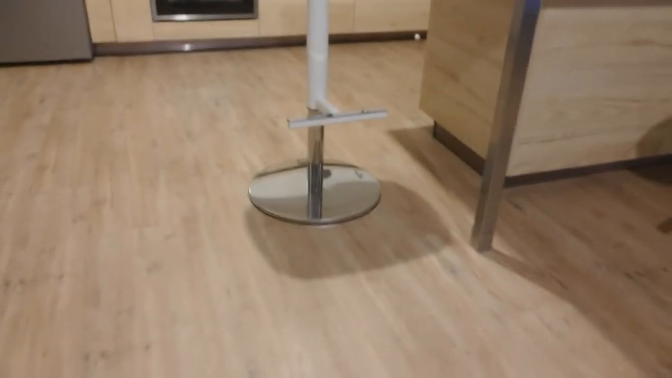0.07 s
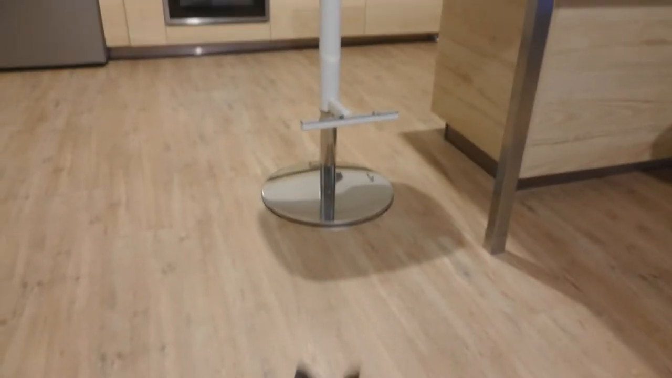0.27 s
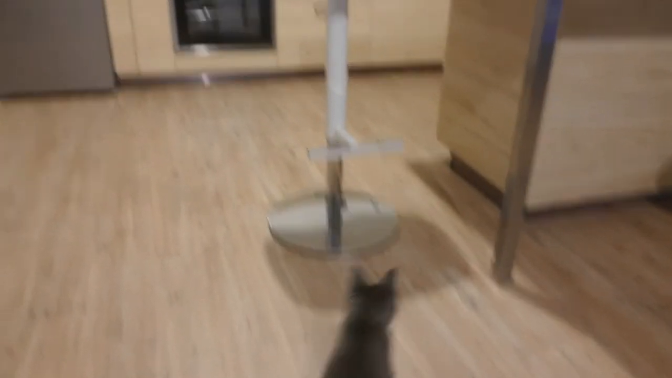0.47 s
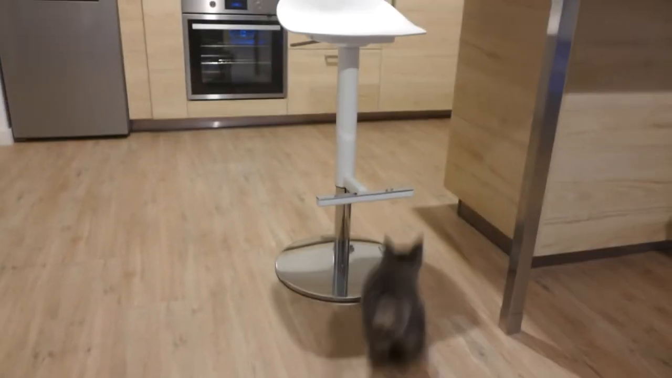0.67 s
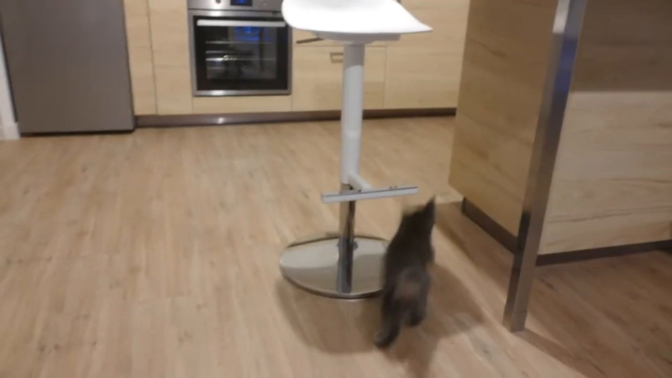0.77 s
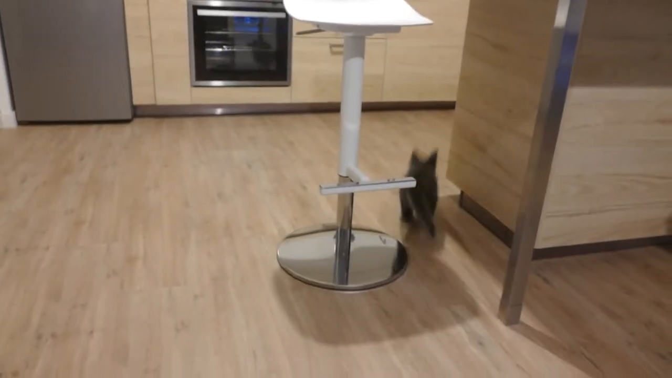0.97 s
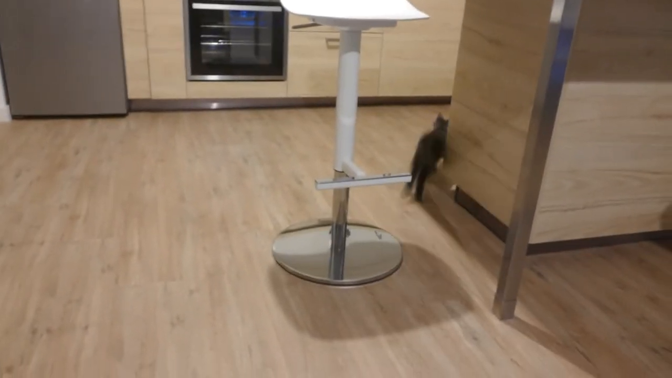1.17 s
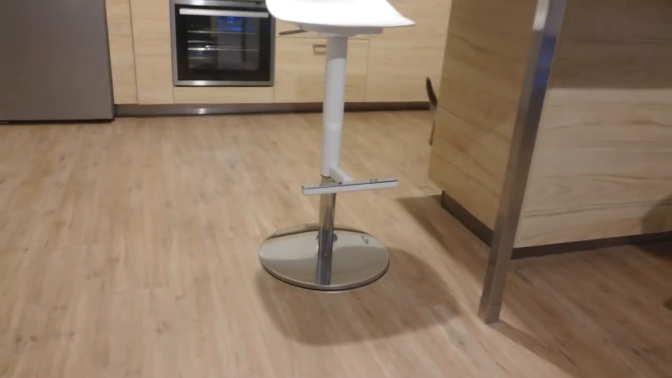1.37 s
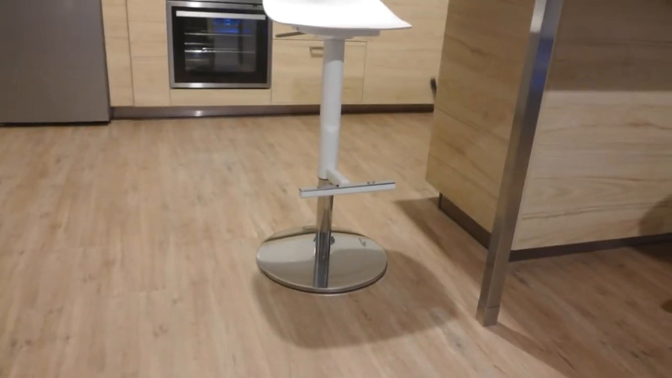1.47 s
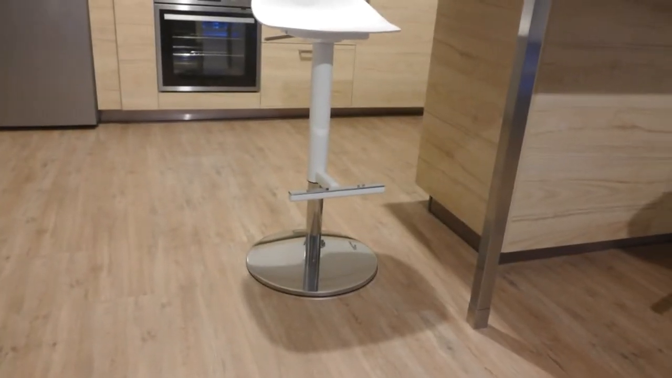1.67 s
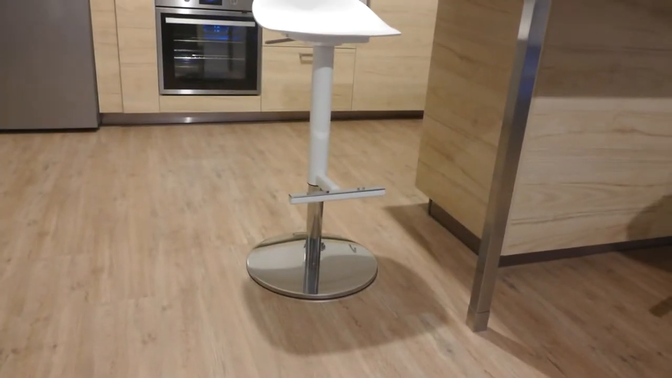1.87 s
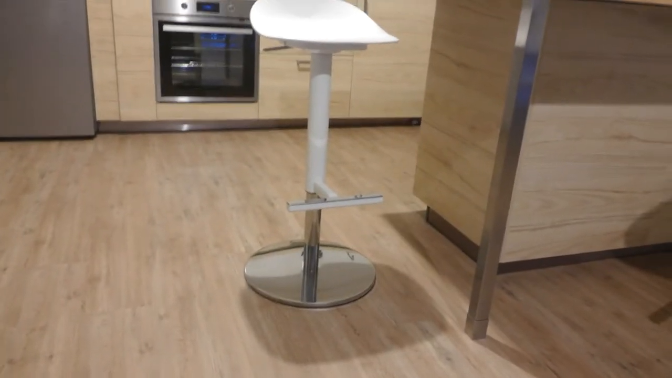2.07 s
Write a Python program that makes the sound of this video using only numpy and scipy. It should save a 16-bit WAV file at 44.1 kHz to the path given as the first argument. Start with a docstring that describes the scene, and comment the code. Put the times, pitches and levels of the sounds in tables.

```python
"""A crumpled foil ball knocks on a kitchen's laminate floor as a kitten chases it, the first hit already sounding.
Squeaks of a scuff and one heavy two-contact thump set the boards and the room ringing.
The ball rolls, knocks on behind the counter and skids: clusters and grains of foil clicks, coloured and reverberated.
Paws flex the boards softly. Close by and fairly dry, fingers (most likely) click and creak a small case:
noise ticks, short decaying modes and stick-slip grains. A steady noise room tone lies underneath."""
import sys
import numpy as np
from scipy import signal
from scipy.fft import rfft, irfft
from scipy.io import wavfile
from scipy.ndimage import uniform_filter1d

SR = 44100
rng = np.random.default_rng(int(sys.argv[2]) if len(sys.argv) > 2 else 0)


def persist_wave(psi):
    """Save psi, clipped to +-1, as 16-bit WAV."""
    counts = np.round(np.clip(psi, -1, 1) * 32767).astype(np.int16)
    wavfile.write(sys.argv[1], SR, np.atleast_2d(counts).T)


N = 92610
T = np.arange(N) / SR
BASS_HZ, TREBLE_HZ = 450, 2780  # corners of the two tone shelves
FACETS_PER_S = 2500  # average rate of foil facet clicks


def amp(db):
    """Decibels to gain."""
    return 10 ** (np.asarray(db) / 20)


def decay(t, t60):
    """Exponential fall of 60 dB in t60 seconds."""
    return np.exp(-np.log(1000) * t / t60)


def read(points, hz):
    """Interpolates a table on a log-frequency axis, holding its end values."""
    f, value = np.transpose(points)
    return np.interp(np.log(hz + 1), np.log(f + 1), value)


def add(mix, s, sound):
    """Lays a sound into the mix at time s; it may have begun before zero."""
    at = round(s * SR)
    sound = sound[..., max(-at, 0):]
    part = mix[:, max(at, 0):][:, :sound.shape[-1]]
    part += sound[..., :part.shape[1]]


def through(x, response):
    """Convolution, channel by channel."""
    return signal.fftconvolve(np.atleast_2d(x), np.atleast_2d(response), axes=1)[:, :N]


def filtered(x, order, hz, kind):
    """Butterworth filter."""
    return signal.sosfilt(signal.butter(order, hz, kind, fs=SR, output="sos"), x)


def colour(x, points, bass_db=0, treble_db=0, size=4096):
    """Minimum-phase filter with the given spectrum plus a bass and a treble shelf."""
    hz = abs(np.fft.fftfreq(size, 1 / SR))
    db = read(points, hz)
    db += bass_db / (1 + (hz / BASS_HZ) ** 2)
    db += treble_db * hz ** 2 / (hz ** 2 + TREBLE_HZ ** 2)
    # The Hilbert transform of the log gain gives the phase of a causal response.
    spectrum = np.exp(np.conj(signal.hilbert(np.log(amp(db)))))
    return through(x, np.fft.ifft(spectrum).real[:size // 2])


# Likeness of the two ports in diffuse sound. Each row: frequency in Hz, correlation from 0 to 1.
PORT_LIKENESS = [(200, 0.93), (400, 0.8), (750, 0.56), (1400, 0.05)]


def diffuse():
    """Unit noise at two ports, alike in the bass and nearly independent higher up."""
    a, b = rfft(rng.standard_normal((2, N)))
    same = read(PORT_LIKENESS, np.fft.rfftfreq(N, 1 / SR))
    return irfft(np.array([a, same * a + np.sqrt(1 - same ** 2) * b]), N)


# Reverberation of the room. Each row: frequency in Hz, 60 dB decay time in s.
ROOM_DECAY = [(80, 0.71), (220, 0.53), (2000, 0.77), (4000, 0.83), (7500, 0.67), (11000, 0.43)]


def room(early_db=5, early_s=0.029):
    """Room response: a lifted early part, then a tail in which each band dies at its own speed."""
    hz, t, z = signal.stft(diffuse()[:, :SR], SR, nperseg=512)
    t60 = read(ROOM_DECAY, hz)[:, None]
    even_energy = np.sqrt(np.log(1000) / (t60 * SR))
    tail = signal.istft(z * decay(t, t60) * even_energy, SR)[1]
    return tail * amp(early_db * np.exp(-T[:tail.shape[1]] / early_s) + 2)


def grains(count, per_s):
    """Sparse clicks at random times and of random size, unit power."""
    fires = rng.random(count) < per_s / SR
    return rng.standard_normal(count) * fires * np.sqrt(SR / per_s)


def contact(length, size=4096):
    """A first touch and a dying cluster of snaps, with its spectrum evened out."""
    snaps = grains(size, FACETS_PER_S) * np.exp(-T[:size] / length)
    snaps[0] += np.sqrt(SR / FACETS_PER_S)
    z = rfft(snaps)
    return irfft(z / np.sqrt(uniform_filter1d(abs(z) ** 2, size=31) + 1e-12))


def flex(db, hz, rise_s):
    """A board flexes under a weight for a few cycles, strongest at rise_s."""
    return amp(db) * T / rise_s * np.exp(1 - T / rise_s) * np.sin(2 * np.pi * hz * T)


# Spectrum of the room tone. Each row: frequency in Hz, gain in dB.
TONE_SPECTRUM = [(20, -90.5), (55, -48), (120, -46.5), (750, -62), (8500, -70.5), (16000, -83)]


def room_tone():
    """Steady diffuse noise of the room, strongest in the bass."""
    return colour(diffuse(), TONE_SPECTRUM)


# Soft paw falls. Each row: start in seconds, level in dB, pitch in Hz.
PAW_FALLS = [(.052, -44, 404), (.838, -57, 502), (1.125, -55, 512), (1.591, -47, 131)]


def paws():
    """Soft pushes flex the boards, each at the pitch of its spot."""
    out = np.zeros((2, N))
    for s, db, hz in PAW_FALLS:
        add(out, s, flex(db, hz, rise_s=0.0041))
    return out + .5 * through(out, room())


# Case modes. Each row: multiple of the pitch, basic 60 dB decay time in s, left gain in dB, right gain in dB.
CASE_MODES = [(1, 0.012, -5.5, 7.5), (1.45, 0.014, -16.5, -5), (2.5, 0.014, -17.5, -7.5)]
PORT_DELAY_S = 0.0006


def case_ring(hz, sustain=1, rise_s=0.00018, low_cut_hz=520, size=2048):
    """The case's modes ring briefly without bass, reaching the right port a little later."""
    t = np.maximum(T[:size] - np.array([[0], [PORT_DELAY_S]]), 0)
    ring = np.zeros((2, size))
    for k, t60, left_db, right_db in CASE_MODES:
        ring += amp([[left_db], [right_db]]) * decay(t, t60 * sustain) * np.sin(2 * np.pi * k * hz * t)
    return filtered(ring * (1 - np.exp(-t / rise_s)), 3, low_cut_hz, "highpass")


# Spectrum of a tick on the case. Each row: frequency in Hz, gain in dB.
TICK_SPECTRUM = [(100, -12.5), (400, -2.5), (1200, 9), (2700, 4.5), (4300, 2), (5600, -4.5), (8000, -12),
                 (15500, -19.5)]
# Clicks of the case. Each row: start in seconds, ring gain in dB, tick gain in dB, pitch in Hz.
CASE_CLICKS = [(1.3941, -30.5, -32, 975), (1.407, -47, -21, 765), (1.4224, -31, -23.5, 745),
               (1.4275, -35, -28, 716), (1.4305, -33, -17.5, 800), (1.4562, -34.5, -24, 810),
               (1.68, -40, -32, 850), (1.687, -32.5, -23, 770), (1.7045, -41.5, -28, 935),
               (2.0621, -29, -9, 910), (2.0628, -15.5, -14, 660), (2.095, -26, -15, 740)]
TICK_DECAY_S, RIGHT_TICK_HZ = 0.0022, 7300


def case_clicks(size=1024):
    """A dying noise tick sounds with the ring of the case modes; the right port hears it duller."""
    out = np.zeros((2, N))
    for s, ring_db, tick_db, hz in CASE_CLICKS:
        tick = rng.standard_normal((2, size)) * np.exp(-T[:size] / TICK_DECAY_S)
        tick /= np.linalg.norm(tick, axis=1, keepdims=True)
        tick[1] = filtered(tick[1], 2, RIGHT_TICK_HZ, "lowpass")
        add(out, s, amp(tick_db) * colour(tick, TICK_SPECTRUM))
        add(out, s, amp(ring_db) * case_ring(hz))
    return out


# Finger rubs on the case. Each row: start in seconds, length in seconds, level in dB, pitch in Hz.
CASE_RUBS = [(1.397, 0.042, -39, 770), (2.066, 0.053, -31.5, 796)]
SLIPS_PER_S, RUB_SWELL_DB, RUB_CRACKLE_DB = 4100, 5, -16


def case_rubs():
    """Fingers stick and slip; the swelling grains crackle and excite the case modes."""
    out = np.zeros((2, N))
    for s, length, db, hz in CASE_RUBS:
        count = int(length * SR)
        swell = amp(RUB_SWELL_DB * T[:count] / length)
        slips = grains(N, SLIPS_PER_S)[:count] * signal.windows.tukey(count, .2) * swell
        crackle = colour(slips / (slips.std() + 1e-9), TICK_SPECTRUM)
        add(out, s, amp(db + RUB_CRACKLE_DB) * crackle)
        creak = through(slips, case_ring(hz, sustain=1.1))
        add(out, s, amp(db) * creak / (creak[1, :count].std() + 1e-9))  # level set at the right port
    return out


def handling():
    """Close clicks and rubs of the case, with a little of the room."""
    close = case_clicks() + case_rubs()
    return close + amp(-9.5) * through(close.mean(0), room())


SNAP_S, SNAP_DB, SNAP_DECAY_S = 2.0613, -26, .001


def snap(size=1024):
    """A thin bright noise snap opens the hardest case click, mostly at the left port."""
    out = np.zeros((2, N))
    burst = rng.standard_normal((2, size)) * np.exp(-T[:size] / SNAP_DECAY_S)
    burst *= amp([[0], [-8]])  # left, right
    add(out, SNAP_S, amp(SNAP_DB) * filtered(burst, 2, [6000, 12000], "bandpass"))
    return out


# Squeaks of the scuff. Each row: start in seconds, length in seconds, pitch in Hz, relative level in dB.
SCUFF_SQUEAKS = [(.184, .017, 1720, -2), (.194, .008, 1760, 4), (.183, .029, 820, -2), (.211, .029, 935, 0)]
SQUEAK_WAVER, SQUEAK_DB = 0.025, -40  # pitch waver as a fraction, common gain


def scuff():
    """Brief sine squeaks of randomly wavering pitch, just before the thump."""
    out = np.zeros((2, N))
    for s, length, hz, db in SCUFF_SQUEAKS:
        count = int(length * SR)
        waver = uniform_filter1d(rng.standard_normal(N), size=64)[:count] * np.sqrt(64)
        tone = np.sin(2 * np.pi * np.cumsum(hz * (1 + SQUEAK_WAVER * waver)) / SR)
        add(out, s, amp(SQUEAK_DB + db) * tone * signal.windows.tukey(count, .5))
    return out + amp(-4) * through(out, room())


# Floor and room modes. Each row: frequency in Hz, level in dB.
BOARD_MODES = [(117, -31.5), (221, -25), (273, -29), (343, -37.5), (389, -27), (470, -24), (541, -35.5),
               (667, -29.5)]
BOARDS_RISE_S, BOARDS_T60_S = 0.00066, 0.54


def boards():
    """Floor and room resonances ring on together, each from a random phase."""
    ring = np.zeros(N)
    for hz, db in BOARD_MODES:
        ring += amp(db) * np.sin(2 * np.pi * (hz * T + rng.random()))
    return ring * decay(T, BOARDS_T60_S) * (1 - np.exp(-T / BOARDS_RISE_S))


# Contacts of the thump. Each row: start in seconds, relative level in dB, contact decay in seconds,
# treble shelf in dB, board flex level in dB, flex pitch in Hz.
THUMP_CONTACTS = [(0.2417, -5.5, 0.00043, -1.4, -27.5, 314), (0.2463, -3, 0.0031, 1.1, -12, 500)]
# Spectrum of the thump. Each row: frequency in Hz, gain in dB.
THUMP_SPECTRUM = [(35, -8.5), (110, 21), (250, 31), (480, 32), (750, 24.5), (1150, 17.5), (1750, 17.5),
                  (2000, 15.5), (2700, 15), (3300, 6), (8000, 0.5), (11000, -3), (15000, -23.5)]
THUMP_DIRECT_DB = -12.5


def thump():
    """A heavy landing in two contacts, the second harder and brighter, booms in boards and room."""
    out = np.zeros((2, N))
    for s, db, length, treble_db, flex_db, flex_hz in THUMP_CONTACTS:
        hit = amp(db) * contact(length)
        wet = through(hit, room(early_db=3.5))
        add(wet, 0, amp(THUMP_DIRECT_DB) * hit)
        add(out, s, colour(wet, THUMP_SPECTRUM, treble_db=treble_db))
        add(out, s, flex(flex_db, flex_hz, rise_s=0.0012))
    add(out, THUMP_CONTACTS[0][0], boards())
    return filtered(out, 2, 55, "highpass")


# Level of the slide, held before the first and after the last row. Each row: time in seconds, level in dB.
SLIDE_LEVEL = [(1.84, -78.5), (1.875, -55), (1.975, -64), (1.995, -52.5), (2.05, -55.5)]
# Spectrum of sliding foil. Each row: frequency in Hz, gain in dB.
FOIL_SPECTRUM = [(100, -2.5), (900, 10.5), (2200, 5.5), (4000, 5.5), (15000, -5.5)]
SLIDE_GRAINS_PER_S = 1300


def slide():
    """Foil edges catch on the floor as random grains while the ball skids."""
    level = amp(np.interp(T, *np.transpose(SLIDE_LEVEL)))
    return colour(through(level * grains(N, SLIDE_GRAINS_PER_S), room()), FOIL_SPECTRUM)


# Spectrum of the ball on the boards, rolling and knocking. Each row: frequency in Hz, gain in dB.
BALL_SPECTRUM = [(60, -17), (200, -5), (420, -4), (780, 1.5), (1250, -4), (1800, -3), (2600, -8.5),
                 (4000, -11.5), (7000, -18.5), (15000, -34.5)]
ROLL_START_S, ROLL_S, ROLL_DB, ROLL_ROOM_DB = 0.49, 0.2, -42, -4.5


def roll():
    """Facets tick on the boards as the ball rolls off nearby after the thump, then stops short."""
    swell = np.sqrt(abs(np.sin(np.pi * np.clip((T - ROLL_START_S) / ROLL_S, 0, 1))))
    ticks = amp(ROLL_DB) * swell * grains(N, FACETS_PER_S)
    wet = amp(ROLL_ROOM_DB) * through(ticks, room())
    return colour(ticks + wet, BALL_SPECTRUM, treble_db=3.5)


# Knocks of the ball. Each row: start in seconds, relative level in dB, bass shelf in dB, treble shelf in dB.
BALL_KNOCKS = [(-.008, 7, -2.5, 2.5), (0.182, 4, -6.5, 1), (.191, 0, -6, 4.5), (.601, -11, 6, 4.5),
               (.812, -14.5, 13, 7.5), (.877, -13, 5.5, -10), (1.086, -13.5, 2, -12), (1.112, -20, 6.5, 1),
               (1.207, -8, -8, -7), (1.476, -16, -10, 7), (1.549, -5, -1.5, -4.5), (1.595, -13, 6.5, -2.5),
               (1.837, -5, -4.5, -10.5), (1.869, -9.5, -13, 3)]
HIDDEN_S = 1.3  # from this time on the ball is out of sight behind the counter
CRUMPLE_S, HIDDEN_CRUMPLE_S = 0.0025, 0.0053  # decay of the facet cluster
KNOCK_DIRECT_DB = -7.5  # before halving behind the counter


def ball():
    """Facets give way in clusters; behind the counter these last longer, with less direct sound."""
    out = np.zeros((2, N))
    for s, db, bass_db, treble_db in BALL_KNOCKS:
        hidden = s > HIDDEN_S
        hit = contact(HIDDEN_CRUMPLE_S if hidden else CRUMPLE_S)
        wet = through(hit, room(early_db=4.5))
        add(wet, 0, amp(KNOCK_DIRECT_DB) * (.5 if hidden else 1) * hit)
        add(out, s, amp(db) * colour(wet, BALL_SPECTRUM, bass_db, treble_db))
    return out


# Right port against left for the room sounds. Each row: frequency in Hz, gain in dB.
RIGHT_PORT = [(100, 4.5), (5000, 2.5), (6300, 7), (7600, 15), (9000, 5), (11000, -2.5), (15000, -7)]


def scene():
    """Room sounds reach two unlike ports; the case sounds bypass that port colour."""
    left, right = room_tone() + paws() + scuff() + thump() + slide() + roll() + ball()
    return np.array([left, colour(right, RIGHT_PORT)[0]]) + handling() + snap()


def record(dry):
    """Band limit: a steep linear-phase low-pass at 16.2 kHz."""
    lowpass = signal.firwin(511, 16200, window=("kaiser", 9), fs=SR)
    return signal.oaconvolve(dry, lowpass[None], "same")


dry = scene()
out = record(dry)
persist_wave(out)
```